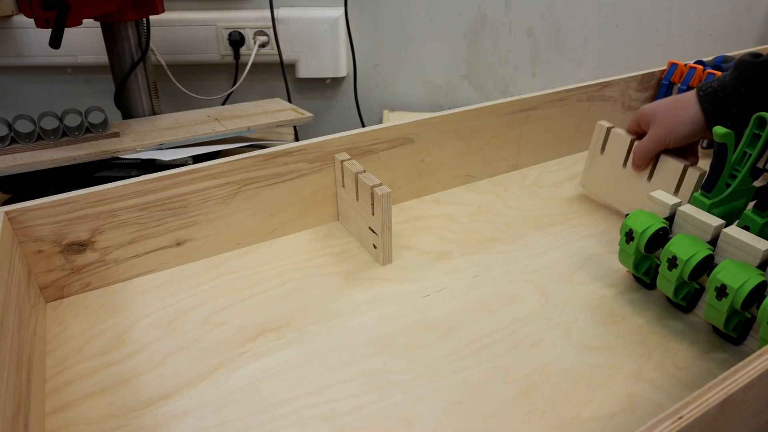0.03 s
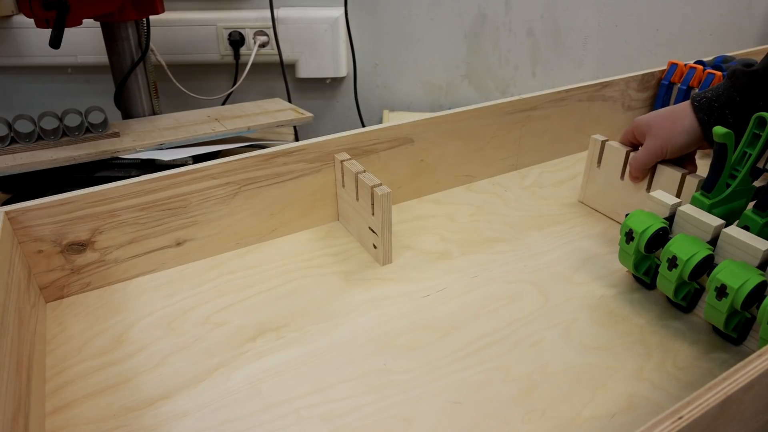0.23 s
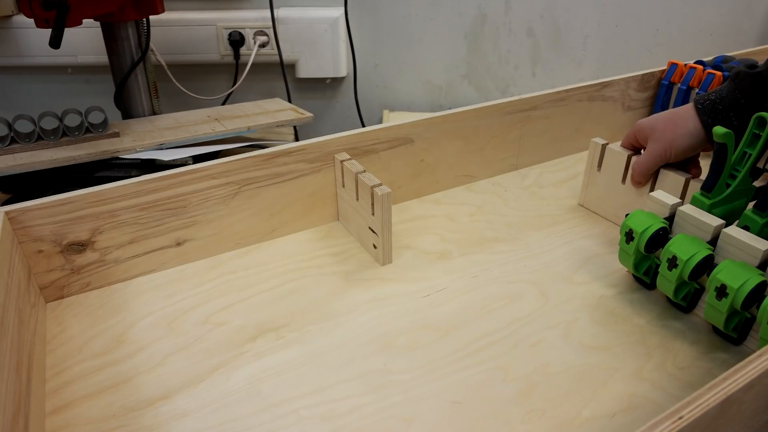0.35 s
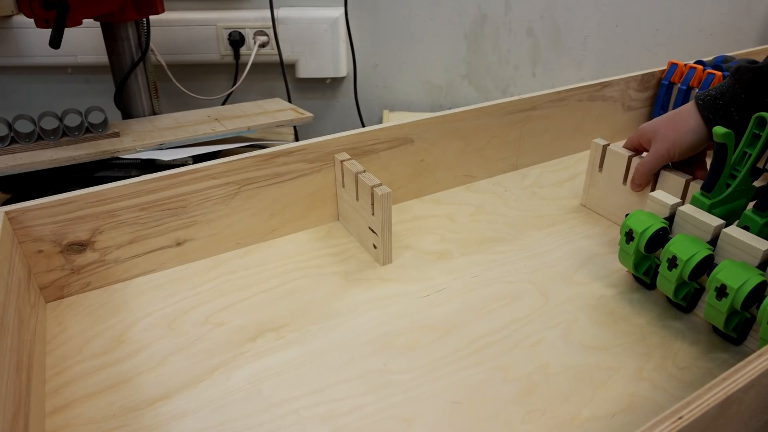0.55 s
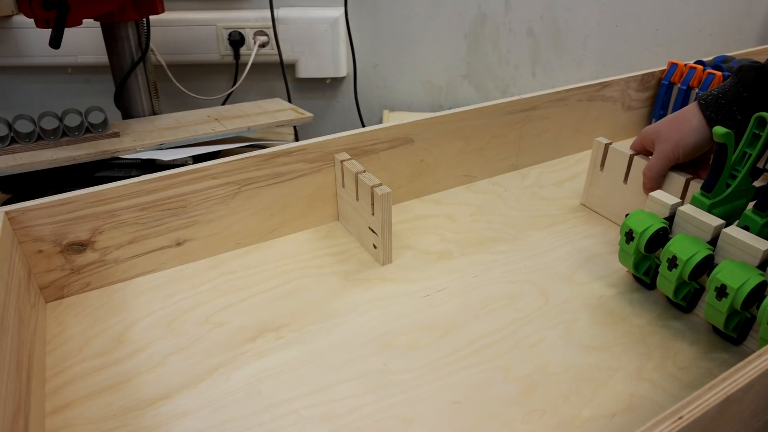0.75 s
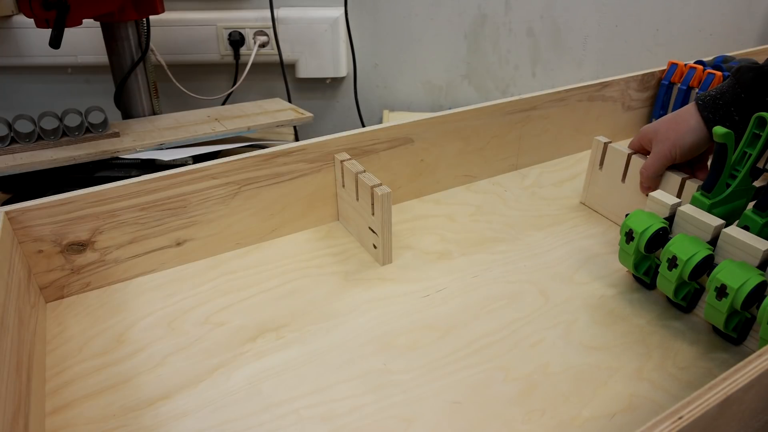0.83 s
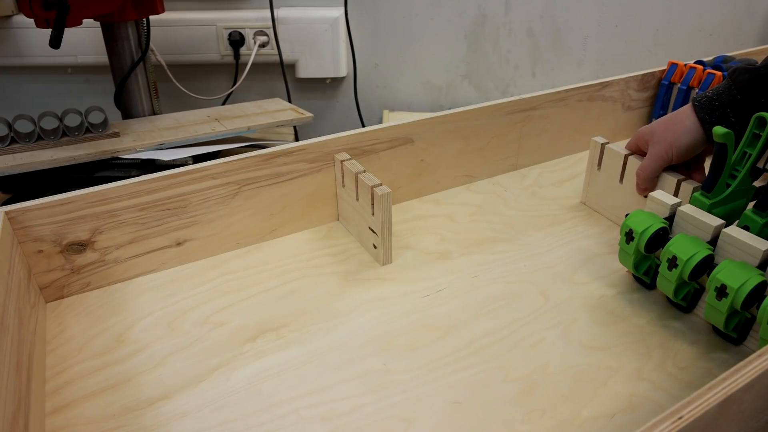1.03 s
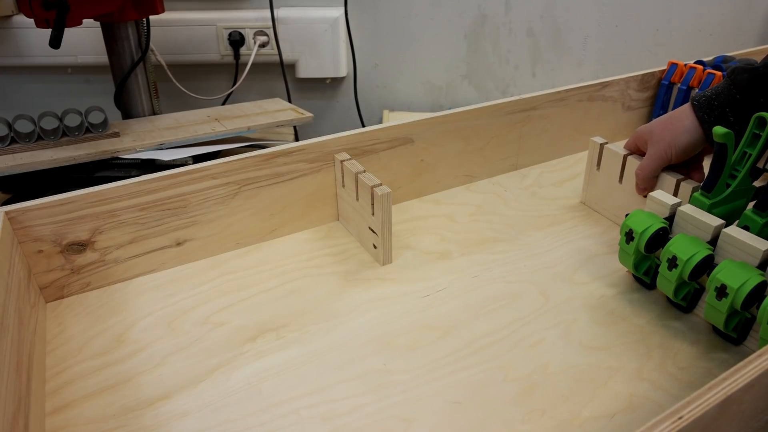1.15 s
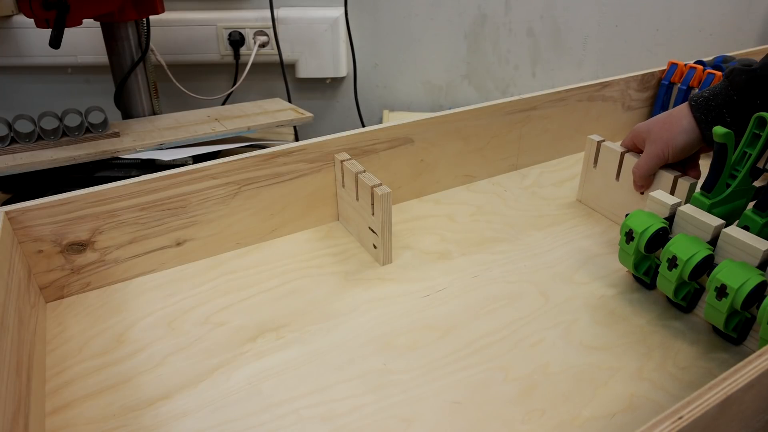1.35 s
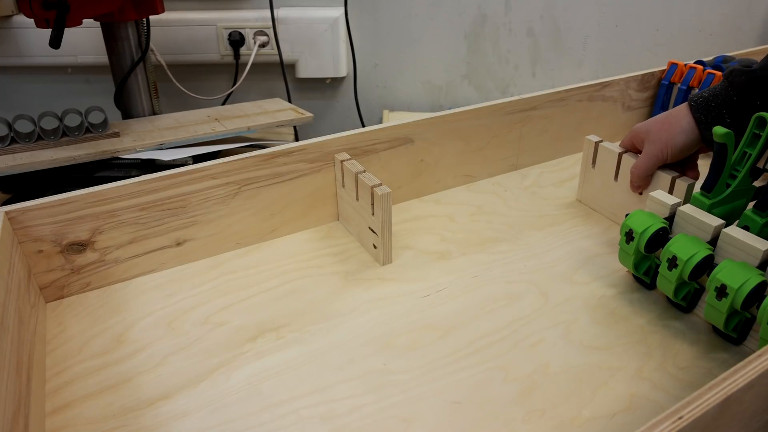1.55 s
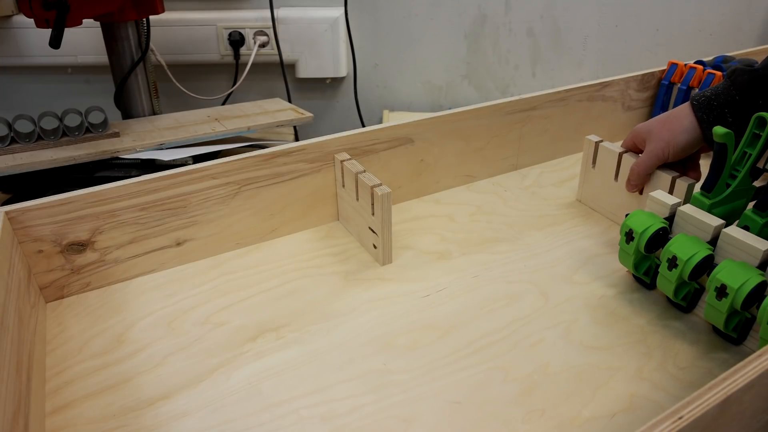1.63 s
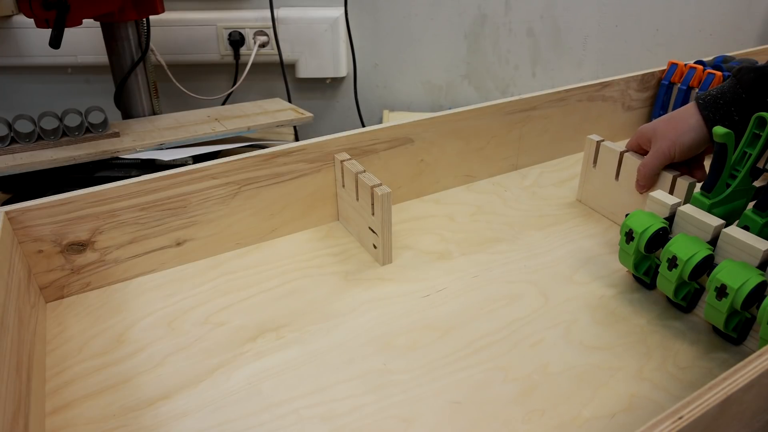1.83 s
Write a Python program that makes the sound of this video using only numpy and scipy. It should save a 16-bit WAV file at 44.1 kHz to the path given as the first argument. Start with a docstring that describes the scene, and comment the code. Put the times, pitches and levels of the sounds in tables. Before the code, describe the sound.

Close stereo pickup in a quiet workshop: light hand brushing, a wooden block clapping onto a plywood panel in two quick touches, another knock shortly after, reverberant decay, then very quiet sliding and finger rustle.

```python
"""Faint brushing over still workshop air: fingers and sleeve, as swelling and fading bands of hiss.
A wooden block lands on the plywood floor of a large box: edge bump, flat clap, later a knock that seats it.
Each knock is a force pulse driving panel modes, clatter and an air slap; near echoes and the bare room answer.
Then the hand nudges the block: bursts of tiny random slips rustle and rumble through block and panel."""
import sys
import numpy as np
from scipy import signal
from scipy.fft import rfft, irfft
from scipy.io import wavfile

SR = 44100
rng = np.random.default_rng(int(sys.argv[2]) if len(sys.argv) > 2 else 0)


def log_audio(samples):
    """Write samples as a 16-bit WAV file to the path given in sys.argv[1]."""
    # one column per channel
    frames = np.atleast_2d(samples).T
    # limit to full scale, then quantise
    limited = np.clip(frames, -1, 1)
    pcm = np.round(limited * 32767).astype(np.int16)
    wavfile.write(sys.argv[1], SR, pcm)


N = 83790  # samples, 1.9 s

# Still air: (frequency [Hz], relative level [dB])
AIR_SPECTRUM = [(25, -21), (60, -17.5), (110, -9.5), (190, -6.5), (350, -3.5), (650, -0.5), (1220, -5.5),
                (1850, -2.5), (2350, -5), (3200, -10), (4000, -13), (5500, -20.5), (7500, -28.5),
                (10000, -30), (14000, -38.5)]
AIR_DB = -68
# Left-right likeness of diffuse sound: (frequency [Hz], correlation [-1 to 1])
LIKENESS = [(100, 1), (280, 0.98), (550, 0.81), (1100, 0.34), (2200, .1), (6000, 0.25)]

# Fingers and sleeve brushing, wood sliding:
# (time [s], rise [s], fade t60 [s], level [dB], centre [Hz], width [octaves])
BRUSHES = [(-.02, 0.018, 0.71, -62, 2310, 1.23), (0.197, 0.0045, 0.17, -58, 2300, 0.24),
           (.197, .003, 0.36, -70, 5000, .6), (.25, 0.073, 1.7, -74, 5360, 0.38),
           (.455, 0.0016, 0.037, -68.5, 5070, 0.44), (0.609, 0.038, 0.63, -68.5, 4120, 0.46),
           (0.757, 0.0062, 0.46, -68, 7200, 0.37), (.76, 0.1, 0.37, -70, 4050, 0.53),
           (1.1, 0.071, 0.6, -75, 3250, 0.095), (1.069, 0.11, 0.86, -71.5, 1780, 0.18),
           (1.15, .06, 0.71, -82, 6500, 0.51), (1.331, 0.061, 0.56, -64, 1870, 1.02),
           (1.652, 0.019, 0.48, -63, 4470, 0.69), (1.75, 0.056, 1, -73, 4150, 0.51)]
BRUSH_SKIRT_DB, BRUSH_TOP_HZ = 18, 9500

# Block contacts: (time [s], level [dB], contact corner [Hz], flatness [0 edge - 1 face],
# panel ring [dB], clatter [dB], room [dB])
KNOCKS = [(0.1978, -6.5, 478, 0.25, 2.5, -2, -9), (0.213, -19.5, 810, 0.41, 2, -6.5, -9.5),
          (0.2354, -1, 1944, 0.99, 2.5, 1, 7), (0.4548, -6.5, 1446, 0.071, 3.5, 1, 6.5),
          (0.4608, -8, 1110, .2, -1, -1.5, -12)]
CONTACT_SLOPE = 3.12  # exponent of the treble fall-off
# Modes of floor with block: (frequency [Hz], level by face [dB], level by edge [dB], t60 [s])
PANEL_MODES = [(229, -13, -12, .17), (253, 3.5, -1, 0.047), (265.9, -17.5, -11, 0.14),
               (292.2, -12.5, -8.5, 0.05), (386, -14.5, 4.5, 0.19), (426.3, -7, -5.5, 0.3),
               (480, 2.5, -11, 0.051), (523.3, -6.5, -17, 0.26), (615, 1.5, -14.5, 0.11),
               (679.3, 1.5, -5.5, 0.16), (760, -2.5, -11.5, 0.11), (766, -8, 1.5, 0.035),
               (815, 11.5, -5.5, 0.011), (856, 0.5, 2.5, 0.066), (898, -3, -3, 0.12),
               (995, -1.5, -9.5, .06), (1068, -13, 4, .1), (1330, -19.5, -12, 0.053),
               (1420, -14.5, -5, 0.1), (1443, -15, -8, .09), (1597, -12.5, -27.5, .34),
               (1664, -9, -26, 0.2), (1957, -10, -21.5, .13), (2407, -16, -7, .04),
               (2374, -13.5, -13, 0.099)]
PANEL_DB = -25.5
RADIATE_HZ = 188  # the panel radiates little below this
BEND_S, EDGE_BEND_S = 0.001429, 0.0012  # 1 kHz bending-wave travel; extra from the block's edge
# Dense vibration of block and box: (frequency [Hz], level [dB])
CLATTER_SPECTRUM = [(30, -24), (70, -29), (130, -22.5), (220, 7), (700, -4), (1700, 7), (2800, -1),
                    (4100, -8.5), (5800, -21.5), (14000, -20)]
CLATTER_DB, CLATTER_T60_S, CLATTER_RISE_S = 13.5, 0.044, 0.0029
# Air slapped out from under the block: (frequency [Hz], level [dB])
SLAP_SPECTRUM = [(25, -23.5), (90, -30.5), (150, -20.5), (250, -6.5), (500, 0), (900, 1.5), (1800, 8.5),
                 (3000, -3), (3900, 5.5), (4700, 8.5), (5400, -10), (12000, -15.5)]
SLAP_DB, SLAP_LEFT_DB = -2.5, -4
SLAP_FACE_DB = -1.5  # added in full for a flat landing
# Echoes from box walls and bench: (delay [s], left gain [ratio], right gain [ratio])
ECHOES = [(.0026, 0.13, 0.5), (.0068, 0.3, 0.25), (0.0298, 0.14, .17), (0.0353, .19, 0.16)]

# Room decay: (frequency [Hz], t60 [s])
ROOM_T60 = [(100, 0.67), (260, .74), (700, 0.75), (1800, 0.77), (3500, 0.66), (9000, .6)]
# Whole box radiating into the room: (frequency [Hz], level [dB])
ROOM_SPECTRUM = [(50, -26.5), (95, -12.5), (135, -5), (190, 13), (280, 18), (700, 19.5), (1400, 15.5),
                 (2100, 13.5), (2900, 5.5), (4100, -1), (5800, -20), (12000, -16)]
ROOM_BUILD_S = 0.028
# Lingering room resonances: (frequency [Hz], level [dB], t60 [s])
LINGER = [(95, -66.5, 1), (177.3, -63, 1.5), (296.4, -43, 0.72), (344, -48, 0.82), (377.5, -54, 1.4),
          (430, -46.5, 1), (658, -48, 0.94), (741, -40.5, 0.6), (894, -45, .55), (1106, -50, 0.93),
          (1335, -46, .55)]

# Nudges over the panel: (time [s], half length [s], level [dB], one band edge [Hz], other band edge [Hz])
NUDGES = [(0.913, 0.033, -59, 220.7, 288), (1.099, 0.46, -75.5, 151, 464), (1.362, 0.017, -60.5, 170, 751),
          (1.382, 0.0052, -53, 133, 660), (1.415, 0.019, -55, 110, 1010), (1.47, 0.0057, -64, 119, 437),
          (1.55, 0.048, -68.5, 158, 566), (1.689, 0.058, -72.5, 198, 696)]
# Body of sliding block and panel: (frequency [Hz], level [dB])
SLIDE_SPECTRUM = [(60, -23.5), (125, -13.5), (180, 0), (270, -2.5), (380, 1.5), (470, -12), (680, 0.5),
                  (900, 2), (1040, -22), (1600, -5), (3000, -18), (8000, -19)]
SLIDE_T60_S = 0.038

LEFT_LAG_S = 0.00007
EDGE_HZ = 15400


def amp(db):
    """Decibels to gain."""
    return 10 ** (np.asarray(db) / 20)


def unit(x):
    """Scales to rms 1."""
    return x / np.sqrt(np.mean(x ** 2) + 1e-20)


def read(points, hz):
    """Interpolates a table on a log-frequency axis."""
    f, value = np.transpose(points)
    return np.interp(np.log(hz + 1), np.log(f + 1), value)


def add(mix, s, sound):
    """Mixes a sound in at time s."""
    part = mix[:, max(round(s * SR), 0):][:, :sound.shape[-1]]
    part += sound[..., :part.shape[1]]


def convolve(a, b):
    """Convolution along time, at most N samples."""
    return signal.fftconvolve(np.atleast_2d(a), np.atleast_2d(b), axes=1)[:, :N]


def causal(gain_at, size=4096):
    """Minimum-phase pulse with the given gain over frequency."""
    hz = abs(np.fft.fftfreq(size, 1 / SR))
    log_gain = np.log(np.maximum(gain_at(hz), 1e-5))
    spectrum = np.exp(np.conj(signal.hilbert(log_gain)))
    return np.fft.ifft(spectrum).real[:size // 2]


def shaped(spectrum):
    """Minimum-phase pulse with a table's spectrum."""
    return causal(lambda hz: amp(read(spectrum, hz)))


def diffuse(size, db_at=np.zeros_like):
    """Stereo noise of a given spectrum; left-right likeness varies with frequency."""
    hz = np.fft.rfftfreq(size, 1 / SR)
    mid, side = rfft(rng.standard_normal((2, size))) * amp(db_at(hz))
    like = np.clip(read(LIKENESS, hz), -1, 1)
    mid = mid * np.sqrt((1 + like) / 2)
    side = side * np.sqrt((1 - like) / 2)
    return irfft([mid + side, mid - side], size)


def hiss(db_at):
    """Diffuse noise of rms 1 with the given spectrum."""
    return unit(diffuse(N, db_at))


def air():
    """Still air of the workshop: steady diffuse noise."""
    return amp(AIR_DB) * hiss(lambda hz: read(AIR_SPECTRUM, hz))


def brushes():
    """Light rubs: each a band of hiss with linear rise and exponential fade."""
    t, out = np.arange(N) / SR, np.zeros((2, N))
    for s, rise_s, t60_s, level_db, centre_hz, width_oct in BRUSHES:
        def band_db(hz):
            offset = np.log2((hz + 1) / centre_hz) / width_oct
            return -BRUSH_SKIRT_DB * np.log(1 + offset ** 2 / 2)

        rise = np.clip((t - s) / rise_s, 0, 1)
        fade = amp(level_db - 60 * np.maximum(t - s - rise_s, 0) / t60_s)
        out += rise * fade * hiss(band_db)
    lowpass = signal.butter(3, BRUSH_TOP_HZ, fs=SR, output="sos")
    return signal.sosfilt(lowpass, out)


def contact(corner_hz):
    """Force pulse of wood on wood: the harder the contact, the more treble."""
    return causal(lambda hz: 1 / np.sqrt(1 + (hz / corner_hz) ** (2 * CONTACT_SLOPE)))


def slap(flatness):
    """Sharp pulse of air pushed from under the block, weaker at left and slightly weaker when flat."""
    level = amp(SLAP_DB + flatness * SLAP_FACE_DB)
    return level * np.outer([amp(SLAP_LEFT_DB), 1], shaped(SLAP_SPECTRUM))


def panel(flatness, size):
    """Decaying plywood modes, dispersed by bending waves: bass travels slower."""
    t, f = np.arange(size) / SR, np.fft.rfftfreq(size, 1 / SR)
    ring = np.zeros(size)
    for hz, face_db, edge_db, t60_s in PANEL_MODES:
        mode_db = edge_db + flatness * (face_db - edge_db)
        ring += amp(mode_db - 60 * t / t60_s) * np.cos(2 * np.pi * hz * t)
    travel_s = BEND_S + (1 - flatness) * EDGE_BEND_S
    # group delay = travel_s * sqrt(1000 / f)
    ring = irfft(rfft(ring) * np.exp(-4j * np.pi * travel_s * np.sqrt(1000 * f)), size)
    return signal.sosfilt(signal.butter(3, RADIATE_HZ, "high", fs=SR, output="sos"), ring)


def clatter(size):
    """Dense, quickly damped vibration of block and box: shaped noise burst."""
    t = np.arange(size) / SR
    burst = diffuse(size) * amp(-60 * t / CLATTER_T60_S) * (1 - np.exp(-t / CLATTER_RISE_S))
    return convolve(burst / np.linalg.norm(burst[0]), shaped(CLATTER_SPECTRUM))[:, :size]


def box(flatness, ring_db, clatter_db, size=16384):
    """Answer to a sharp tap: panel modes plus clatter."""
    ring = amp(PANEL_DB + ring_db) * panel(flatness, size)
    return ring + amp(CLATTER_DB + clatter_db) * clatter(size)


def room():
    """Room answer to a tap: builds up, decays per band, with lingering resonances."""
    hz, t, z = signal.stft(diffuse(SR), SR, nperseg=512)
    t60_s = read(ROOM_T60, hz)[:, None]
    even_energy = np.sqrt(2 * np.log(1000) / (t60_s * SR))
    z = z * amp(-60 * t / t60_s) * even_energy
    noise = signal.istft(z, SR, nperseg=512)[1][:, :SR]

    t = np.arange(SR) / SR
    build = np.minimum(t / ROOM_BUILD_S, 1)
    tail = convolve(noise * build, shaped(ROOM_SPECTRUM))[:, :SR]
    linger = sum(amp(db - 60 * t / t60) * np.sin(2 * np.pi * hz * t) for hz, db, t60 in LINGER)
    return tail + build * linger


def knocks():
    """Block contacts: each force pulse drives box and slap, then near echoes and room."""
    out = np.zeros((2, N))
    for s, level_db, corner_hz, flatness, ring_db, clatter_db, room_db in KNOCKS:
        force = amp(level_db) * contact(corner_hz)
        answer = box(flatness, ring_db, clatter_db)
        add(answer, 0, slap(flatness))
        hit = convolve(force, answer)
        add(out, s, hit)
        add(out, s, amp(room_db) * convolve(force, room()))
        for delay_s, left, right in ECHOES:
            add(out, s + delay_s, hit * np.array([[left], [right]]))
    return out


def nudges(room_db=-29, slips_per_s=1500):
    """Stick-slip easing of the block: swells of random slips excite block, panel and room."""
    t, out = np.arange(N) / SR, np.zeros((2, N))
    burst = diffuse(N) * amp(-60 * t / SLIDE_T60_S)
    answer = convolve(burst / np.linalg.norm(burst[0]), shaped(SLIDE_SPECTRUM))
    add(answer, 0, amp(room_db) * room())
    for s, half_s, level_db, low_hz, high_hz in NUDGES:
        slips = rng.standard_normal(N) * (rng.random(N) < slips_per_s / SR)
        swell = np.exp(-((t - s) / half_s) ** 2)
        band = signal.butter(2, sorted([low_hz, high_hz]), "band", fs=SR, output="sos")
        force = signal.sosfilt(band, slips * swell)
        share = np.sqrt(2 * half_s * SR / N)  # level refers to the nudge's length, not the scene's
        out += amp(level_db) * unit(convolve(force, answer)) * share
    return out


def scene():
    """Hand and block, left channel slightly late, in still air."""
    left, right = brushes() + knocks() + nudges()
    hz = np.fft.rfftfreq(N, 1 / SR)
    left = irfft(rfft(left) * np.exp(-2j * np.pi * hz * LEFT_LAG_S), N)
    return np.array([left, right]) + air()


def record(dry):
    """Band limit: steep linear-phase low-pass."""
    lowpass = signal.firwin(511, EDGE_HZ, window=("kaiser", 9), fs=SR)
    return signal.oaconvolve(dry, lowpass[None], "same")


dry = scene()
out = record(dry)
log_audio(out)
```